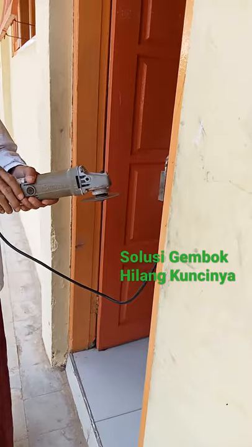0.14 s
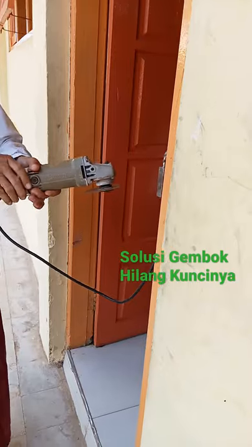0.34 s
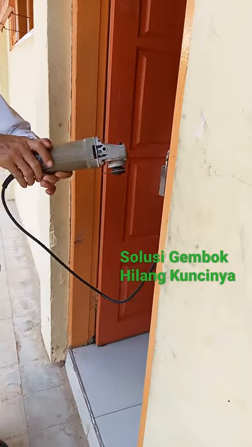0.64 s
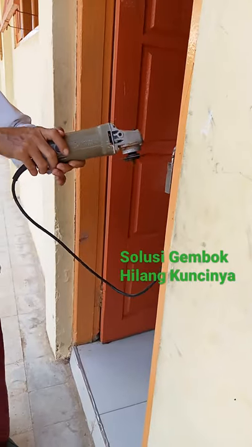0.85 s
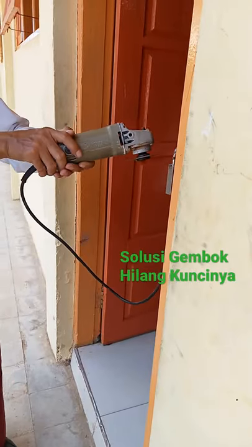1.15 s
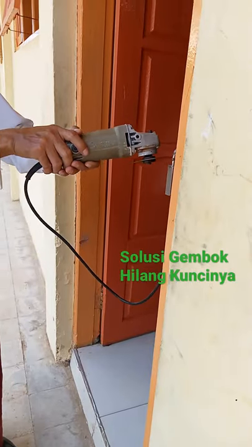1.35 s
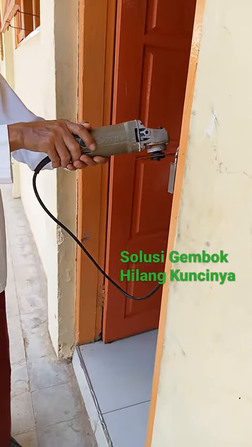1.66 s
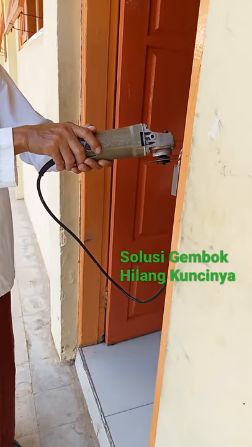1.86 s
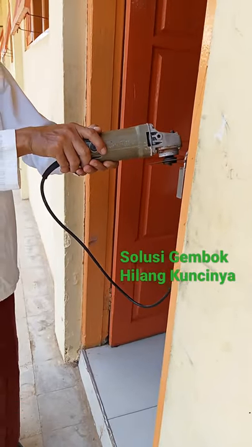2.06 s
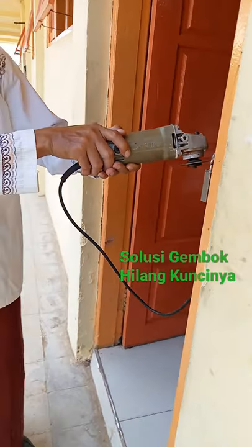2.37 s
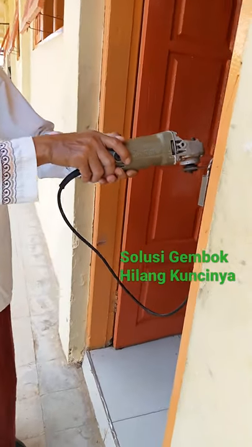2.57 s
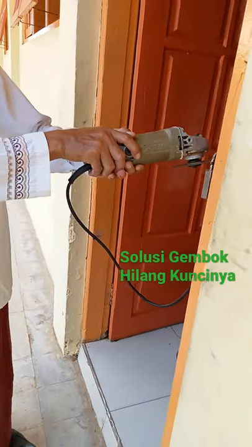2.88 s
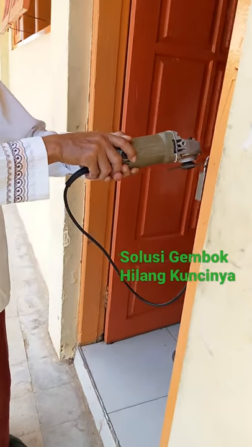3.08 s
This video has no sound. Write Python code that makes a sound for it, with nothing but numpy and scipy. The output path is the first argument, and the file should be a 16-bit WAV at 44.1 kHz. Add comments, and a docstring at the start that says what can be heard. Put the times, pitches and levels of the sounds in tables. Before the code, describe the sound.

A corded angle grinder starts at once and keeps spinning freely in a doorway. Its fan roars and its gears rattle, while a high whine climbs a little, swelling and fading amid short reflections.

```python
"""A doorway: a corded angle grinder is switched on, runs up without load and is moved toward a padlock.
The fan roars through the vents, the armature hums, the bevel gear whines and rattles in its metal head.
Door and walls throw back roar and rattle as drifting echoes with short tails. The tones follow
level curves: the swell and fade that reflections cause as the tool moves."""
import sys
import numpy as np
from scipy import signal
from scipy.fft import rfft, irfft
from scipy.io import wavfile
from scipy.ndimage import uniform_filter1d, map_coordinates

SR = 44100
rng = np.random.default_rng(int(sys.argv[2]) if len(sys.argv) > 2 else 0)


def output_pcm(signal):
    """Save a mono or channel-first signal as 16-bit PCM at the path in sys.argv[1].

    Samples are clipped to [-1, 1] before scaling.
    """
    pcm = np.clip(np.atleast_2d(signal).T, -1, 1) * 32767
    wavfile.write(sys.argv[1], SR, np.round(pcm).astype(np.int16))


N = 142884

START_S, TOP_SPEED_HZ = .078, 530.6
MESH_PER_TURN = 12

# Fan air spectrum. Each row: frequency in Hz, relative density in dB.
AIR_SPECTRUM = [(24, -69), (40, -32), (222, -19.5), (254, -14), (490, -11), (519, -11.5), (560, -19),
                (778, -4.5), (1060, -5.5), (1330, -1.5), (1850, -4.5), (2080, -0.5), (2290, -7),
                (2570, -4.5), (2770, -6.5), (3360, -4), (4000, -7.5), (5200, -30), (8800, -120)]
# Vent hiss spectrum. Each row: frequency in Hz, relative density in dB.
HISS_SPECTRUM = [(2500, -23), (3900, -8), (5200, 3), (5900, 0.5), (6600, 4), (7200, 0.5), (8000, -11),
                 (9500, 6.5), (12200, -11.5), (13600, -4.5), (15500, -9)]
# Hollow resonances of housing and guard. Each row: frequency in Hz, width in Hz, relative level in dB.
HOUSING_MODES = [(212, 40, -13), (412, 69, -3), (786, 68, -2), (934, 130, 2.5), (1218, 94, 3.5),
                 (1334, 63, 0.5), (1485, 13, -12), (1590, 25, -0.5), (1782, 17, 1), (1960, 140, -2.5),
                 (2520, 67, 2.5), (3300, 260, 4.5)]
# Noise gains. Each row: time in seconds, then fan air, low ring, high ring and extra fan lows in dB.
NOISE_GAINS = [(.08, -24.5, -23.5, -16.5, 0.5), (.33, -22.5, -20, -19.5, 3),
               (.52, -23.5, -21.5, -18.5, 2.5), (.8, -23.5, -22.5, -20, 1), (1.1, -23, -24, -22, -2),
               (1.45, -23.5, -27, -21.5, 0.5), (1.8, -22.5, -27, -21.5, -1.5), (2.17, -22.5, -28, -20, -3),
               (2.32, -23, -28.5, -23, 0.5), (2.55, -23, -26, -23.5, -0.5), (2.9, -24.5, -26, -24, -1.5),
               (3.24, -23.5, -25.5, -24, -6)]
# Low ring of the gear head. Each row: frequency in Hz, width in Hz, relative level in dB.
HEAD_LOW_MODES = [(4360, 450, -10), (4730, 405, 14.5), (5250, 460, -1), (5770, 270, -6)]
# High ring of the gear head. Each row: frequency in Hz, width in Hz, relative level in dB.
HEAD_HIGH_MODES = [(9060, 930, -2.5), (9450, 590, 7.5), (10460, 750, -3.5), (11230, 700, -6.5)]
# Harder gear chatter. Each row: centre in seconds, low ring boost in dB, high ring boost in dB.
CHATTER_BURSTS = [(.485, 1, 7), (.62, 5, 3), (.708, 4, -1), (2.14, 5, 3), (2.168, 0, 4), (2.199, 6, 2),
                  (2.45, 8, -4), (2.702, 9, 3), (2.828, 5.5, -7)]
# Gear-mesh whine. Each row: time in seconds, level in dB.
WHINE_LEVELS = [(0.1, -55.2), (0.15, -36.7), (0.21, -27.9), (0.26, -31.1), (0.32, -25.4), (0.37, -36.9),
                (0.43, -23.9), (0.52, -18.1), (0.57, -27.5), (0.62, -22.2), (0.7, -24.6), (0.76, -34.8),
                (0.95, -30.7), (1.04, -25.7), (1.13, -42.2), (1.22, -25.9), (1.29, -46.5), (1.35, -29.7),
                (1.41, -30.9), (1.55, -22.7), (1.7, -26.1), (1.85, -23.3), (2.05, -22.3), (2.16, -20.6),
                (2.38, -21.9), (2.5, -26.7), (2.62, -43.2), (2.72, -29.0), (2.84, -33.4), (2.98, -25.4),
                (3.07, -35.1), (3.15, -23.2), (3.24, -22.2)]
# Other tones. Each row: time in seconds, then levels of hum, motor note and mesh octave in dB.
TONE_LEVELS = [(.1, -57, -62, -60), (.32, -37, -46, -48), (.55, -39.5, -46, -43), (.75, -41, -35, -45),
               (1.05, -41, -36, -50), (1.3, -49, -37, -51), (1.6, -49, -32, -51), (1.85, -49, -28.5, -50),
               (2.02, -42, -31, -48), (2.22, -37, -25, -41), (2.45, -36.5, -28.5, -39),
               (2.8, -46, -29, -38), (3., -52, -31, -43), (3.24, -58, -29, -45)]
# Brief notes in the roar. Each row: centre in seconds, frequency in Hz, width in Hz, peak level in dB.
ROAR_NOTES = [(.945, 2505, 80, -27.5), (1.17, 960, 220, -29), (2.15, 1250, 280, -29),
              (2.52, 1290, 300, -28.5), (2.63, 1290, 300, -25.5), (2.8, 2515, 70, -30),
              (3.04, 2540, 70, -29)]
# Door and wall echoes. Each row: delay in ms, drift in ms per second, level re direct sound in dB.
WALL_ECHOES = [(1.9, -0.117, -24), (4.3, -0.308, -20.5), (7.7, 0.273, -22)]


def fan(air_db, lows_db, housing_db=-5.5, hiss_db=-22, lows_hz=655, flutter_db=.75):
    """Cooling air roars through the housing and hisses out of the vents."""
    roar = noise(AIR_SPECTRUM) + undb(housing_db) * ring(white, HOUSING_MODES)
    lows = signal.sosfiltfilt(signal.butter(2, lows_hz, fs=SR, output="sos"), roar)
    roar = roar + (undb(lows_db) - 1) * lows
    hiss = undb(hiss_db) * noise(HISS_SPECTRUM)
    return (undb(air_db) * roar + hiss) * undb(flutter_db * walk(40.11))


def gear_rattle(t, turns, low_db, high_db, scatter_db=4.3, flutter_db=1.12, spurt_db=1.9, burst_s=.0039):
    """Teeth knock with uneven force; each knock rings the modes of the metal head in a new mix."""
    contacts = np.flatnonzero(np.diff(np.floor(MESH_PER_TURN * turns)))
    knocks = np.zeros(N)
    knocks[contacts] = undb(scatter_db * np.minimum(white()[:len(contacts)], 2.8))
    knocks *= undb(flutter_db * walk(80))
    drive = lambda: knocks * rng.choice([-1, 1], N)
    low_db = low_db + spurt_db * walk(110)
    for at_s, low_boost_db, high_boost_db in CHATTER_BURSTS:
        burst = np.exp(-((t - at_s) / burst_s) ** 2)
        low_db = low_db + low_boost_db * burst
        high_db = high_db + high_boost_db * burst
    low_ring = undb(low_db) * ring(drive, HEAD_LOW_MODES, order=2)
    high_ring = undb(high_db) * ring(drive, HEAD_HIGH_MODES, order=2)
    return low_ring + high_ring


def rotor_tones(t, turns, throb_hz=10.35, throb_peak_s=2.15, throb_depth=.38):
    """Gear-mesh whine and its octave, unbalance hum, and a rough, throbbing motor note."""
    whine_db, = curves(WHINE_LEVELS, t)
    hum_db, motor_db, octave_db = curves(TONE_LEVELS, t)
    throb = 1 + throb_depth * np.cos(2 * np.pi * throb_hz * (t - throb_peak_s))
    whine = undb(whine_db) * tone(turns, per_turn=MESH_PER_TURN, rough=.18, waver_hz=110)
    hum = undb(hum_db) * tone(turns, per_turn=1, rough=.1, waver_hz=20)
    motor = undb(motor_db) * throb * tone(turns, per_turn=4, rough=.5, waver_hz=130)
    octave = undb(octave_db) * tone(turns, per_turn=2 * MESH_PER_TURN, rough=.7, waver_hz=130)
    return whine + hum + motor + octave


def armature_hz(t, slow_s=.645, fast_s=.15, wobble=.0003):
    """The armature closes on its top speed in a slow and a fast stage."""
    on_s = np.maximum(t - START_S, 0)
    slow_gap_hz = 112.5 * np.exp(-on_s / slow_s)
    fast_gap_hz = 14 * np.exp(-on_s / fast_s)
    return (TOP_SPEED_HZ - slow_gap_hz - fast_gap_hz) * (1 + wobble * walk(12))


def roar_notes(t, sigma_s=.046):
    """Narrow bands of the roar rise and sink again."""
    out = 0
    for at_s, hz, width_hz, db in ROAR_NOTES:
        envelope = np.exp(-((t - at_s) / sigma_s) ** 2 / 2)
        out = out + undb(db) * envelope * ring(white, [(hz, width_hz, 0)], order=2)
    return out


def doorway(x, t, tails=6, t60_s=.21, porch_db=-7.5):
    """Door and wall echoes drift and porch tails trade places as the tool moves; rms is kept."""
    out = x
    for delay_ms, drift_ms_per_s, db in WALL_ECHOES:
        delay_s = (delay_ms + drift_ms_per_s * t) / 1000
        out = out + undb(db) * map_coordinates(x, [(t - delay_s) * SR], order=3)
    age_s = t[:SR // 2]
    decay = np.exp(-np.log(1000) * age_s / t60_s) * (age_s > .005)
    for _ in range(tails):
        tail = rng.standard_normal(len(age_s)) * decay
        reverb = signal.fftconvolve(x * walk(3.005), tail / np.linalg.norm(tail))[:N]
        out = out + undb(porch_db) / np.sqrt(tails) * reverb
    return out * np.std(x) / np.std(out)


def undb(db):
    """Decibels to gain."""
    return 10 ** (np.asarray(db) / 20)


def unit(x):
    """Scale to rms 1."""
    return x / np.sqrt(np.mean(x ** 2))


def curves(table, t):
    """Each value column, interpolated linearly in time."""
    times_s, *columns = np.array(table, float).T
    return [np.interp(t, times_s, column) for column in columns]


def white():
    """White noise."""
    return rng.standard_normal(N)


def walk(rate_hz):
    """Smooth random signal, rms 1, changing at about rate_hz."""
    step = max(int(SR / rate_hz), 2)
    held = np.repeat(rng.standard_normal(N // step + 1), step)
    return unit(uniform_filter1d(uniform_filter1d(held, step), step)[:N])


def noise(spectrum):
    """Shaped noise, rms 1, falling 60 dB per octave outside the given spectrum."""
    hz, db = np.array(spectrum, float).T
    octaves = np.log2(np.maximum(np.fft.rfftfreq(N, 1 / SR), 1))
    octaves_outside = abs(octaves - np.clip(octaves, np.log2(hz[0]), np.log2(hz[-1])))
    shape_db = np.interp(octaves, np.log2(hz), db) - 60 * octaves_outside
    return unit(irfft(rfft(white()) * undb(shape_db), N))


def ring(drive, modes, order=1):
    """Sum of resonances, rms 1, each fed by its own call of drive."""
    out = 0
    for hz, width_hz, db in modes:
        mode = drive()
        for _ in range(order):
            mode = signal.lfilter(*signal.iirpeak(hz, hz / (width_hz * order), SR), mode)
        out = out + undb(db) * unit(mode)
    return unit(out)


def tone(turns, per_turn, rough, waver_hz):
    """A multiple of the rotation, unsteady in strength and phase."""
    waver = 1 + rough * (walk(waver_hz) + 1j * walk(waver_hz))
    return unit(np.real(waver * np.exp(2j * np.pi * per_turn * turns)))


def scene(switch_s=.0027, swell_s=.3, swell_from_db=-21):
    """The switch closes, the noise swells and the grinder runs up; both channels alike."""
    t = np.arange(N) / SR
    turns = np.cumsum(armature_hz(t)) / SR
    running = np.clip((t - START_S) / switch_s, 0, 1)
    swell_left = np.clip(1 - (t - START_S) / swell_s, 0, 1)
    swell = running * undb(swell_from_db * swell_left ** 1.63)
    air_db, low_ring_db, high_ring_db, fan_lows_db = curves(NOISE_GAINS, t)
    tool_noise = fan(air_db, fan_lows_db) + gear_rattle(t, turns, low_ring_db, high_ring_db)
    mix = doorway(swell * tool_noise, t) + roar_notes(t) + running * rotor_tones(t, turns)
    return np.tile(mix, (2, 1))


def record(dry):
    """Steep low-pass on the top treble."""
    cut_hz = 15520
    return signal.sosfilt(signal.ellip(16, .1, 90, cut_hz, fs=SR, output="sos"), dry)


dry = scene()
out = record(dry)
output_pcm(out)
```